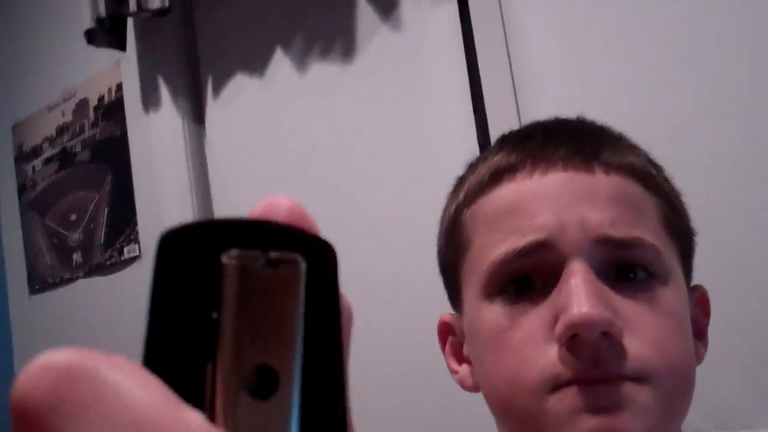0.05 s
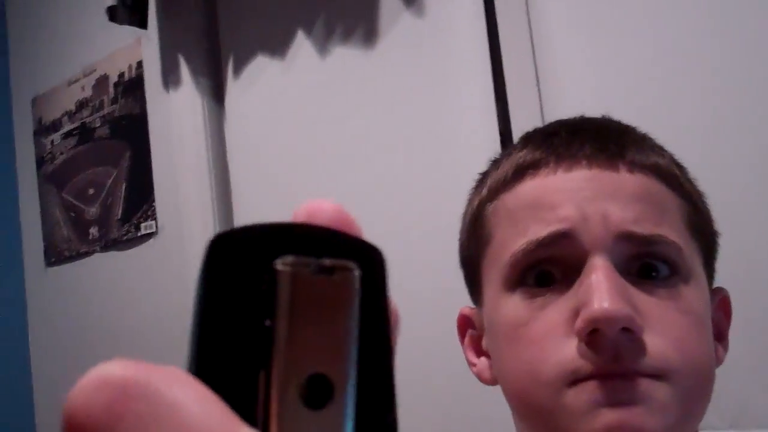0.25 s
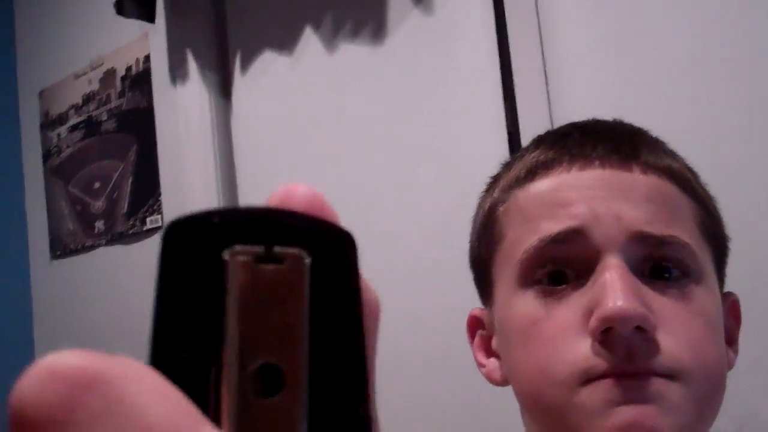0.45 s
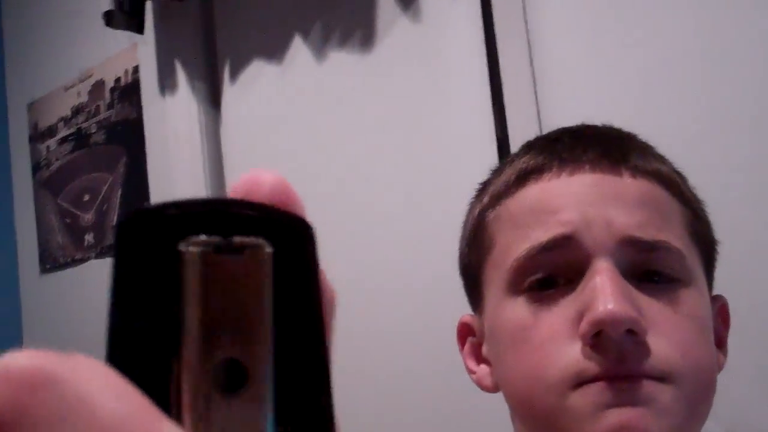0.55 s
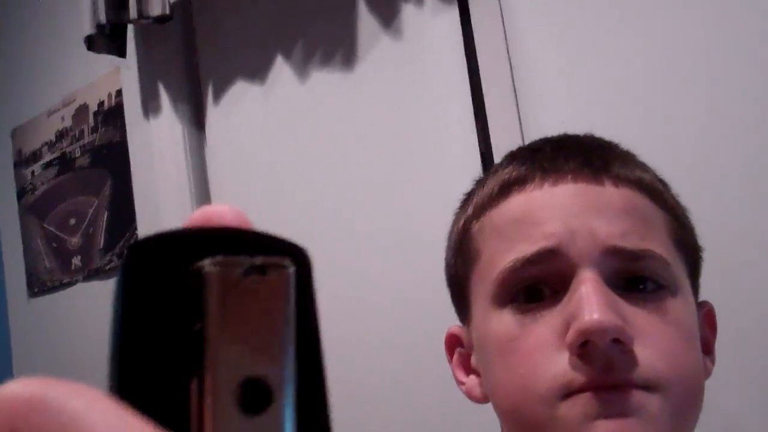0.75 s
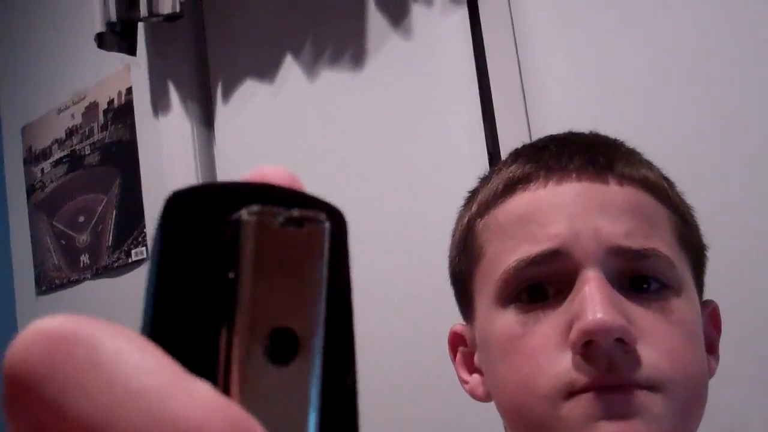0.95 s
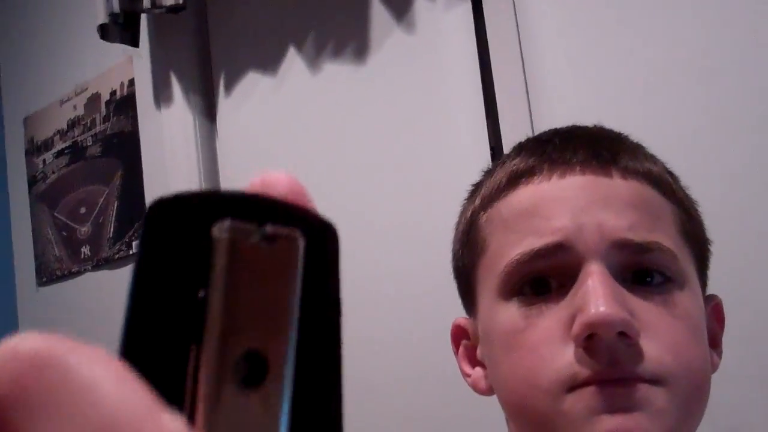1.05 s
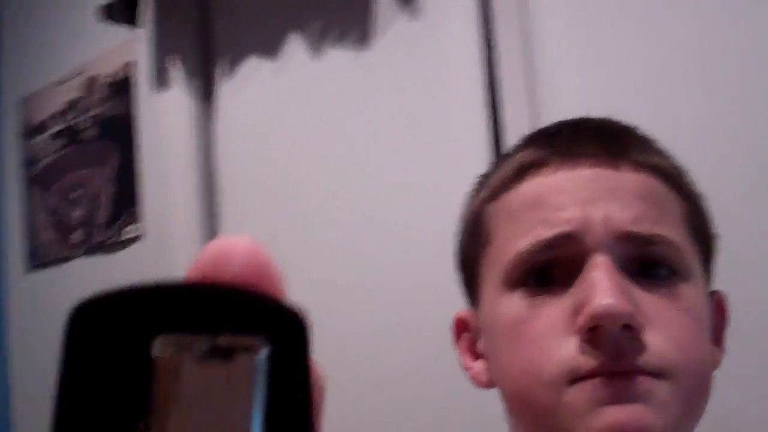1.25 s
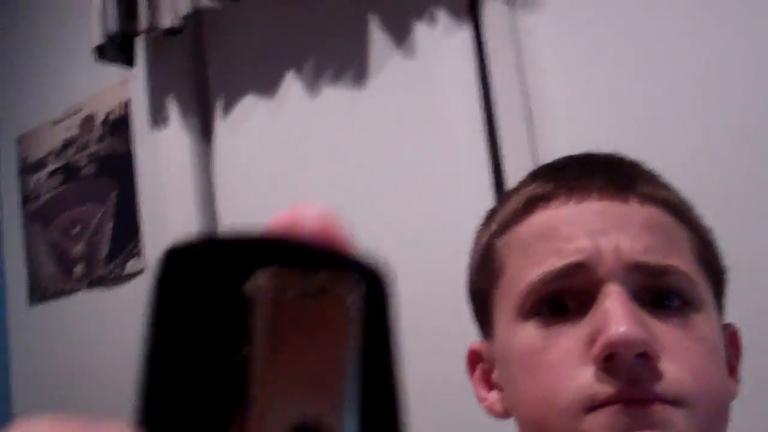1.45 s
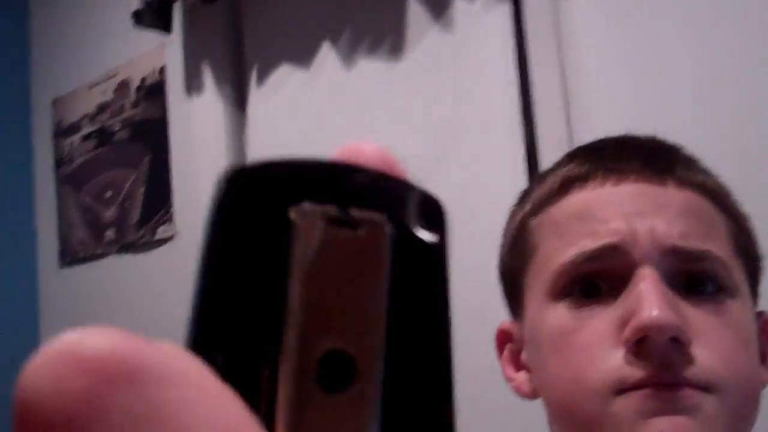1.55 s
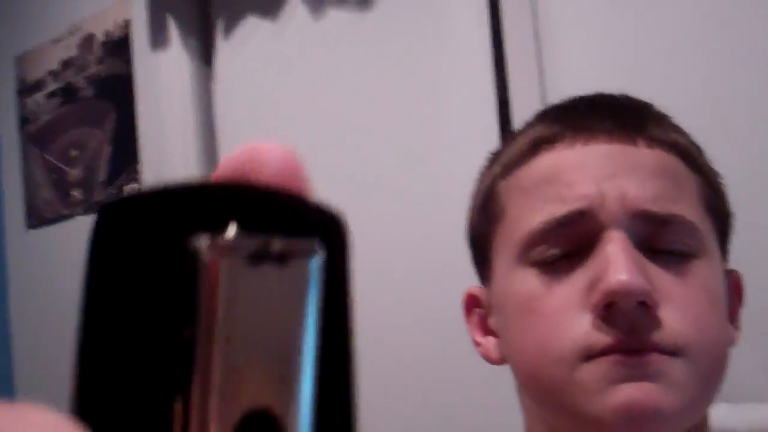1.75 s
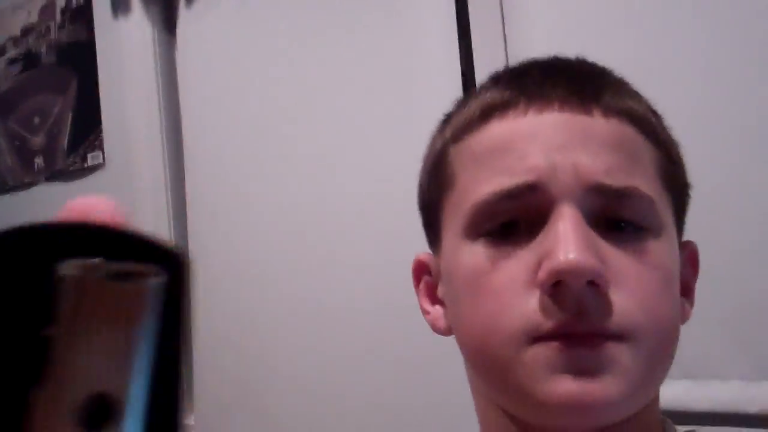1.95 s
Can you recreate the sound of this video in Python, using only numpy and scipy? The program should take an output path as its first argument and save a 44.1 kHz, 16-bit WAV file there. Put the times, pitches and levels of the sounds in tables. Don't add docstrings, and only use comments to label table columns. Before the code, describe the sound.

Stapler squeezed hard two times near the microphone, overloaded cracks followed by crisp spring-back clicks

```python
import sys
import numpy as np
from scipy import signal
from scipy.fft import rfft, irfft
from scipy.io import wavfile
from scipy.ndimage import uniform_filter1d

SR = 44100
rng = np.random.default_rng(int(sys.argv[2]) if len(sys.argv) > 2 else 0)


def gain_from_db(level_db):
    decades = np.asarray(level_db, float) / 20
    return 10 ** decades


def pcm_store(signal):
    levels = np.round(np.clip(np.atleast_2d(signal), -1, 1) * 32767)
    wavfile.write(sys.argv[1], SR, levels.astype(np.int16).T)


N = 88288

# (time [s], level [dB])
GAIN_RIDE = [(0, 0), (.44, 0.5), (.48, -11), (.8, -7), (1.08, 0), (1.17, -1.5), (1.58, 2.5), (1.62, -3),
             (1.9, -12.5), (2.0, -19.5)]
# (frequency [Hz], level [dB per Hz])
RUMBLE_COLOUR = [(25, -8), (80, -8), (200, -7), (370, -5), (620, -6), (1000, -11), (1500, -11.5),
                 (3000, -28.5)]
# (frequency [Hz], level [dB])
HISS_COLOUR = [(800, 0.5), (2000, -1.5), (6000, -1), (13500, -1)]
# (frequency [Hz], level [dB], width [Hz])
HUM_TONES = [
    (124, -63, 2.3),
    (295, -76, 6.0),
    (603, -69.5, 2.7),
]
RUMBLE_DB, RUMBLE_FOLLOWS = -61, 0.97
HISS_DB, HISS_FOLLOWS = -56.5, 0.37

# (frequency [Hz], fall by 60 dB [s])
ROOM_DECAY = [(200, 0.04), (700, .2), (1600, 0.2), (4500, 0.28), (9000, 0.25), (14000, 0.17)]
# (frequency [Hz], level [dB])
ROOM_COLOUR = [(200, -16), (700, -2), (1500, -7), (3000, -5), (6200, -4), (9000, -5.5), (14000, 1.5)]
# (frequency [Hz], left-right likeness [0 to 1])
STEREO_LIKENESS = [(200, 0.65), (550, .8), (1600, 0.21), (5000, 0.06)]
SLAM_ROOM_DB, CLICK_ROOM_DB = -6, -18
WALL_S, BUILD_S = 0.0014, 0.002
NEAR_DB, NEAR_T60_S = 9.5, 0.04
PANEL_HZ, PANEL_WIDTH_HZ, PANEL_DB, PANEL_T60_S = 1520, 300, -15, 0.4

# (time [s], level [dB], chatter length [ms], favoured frequency [Hz], favour [dB])
SLAM_HITS = [
    (.4655, 11, 3.58, 1682, 4.5),
    (1.6003, 9.5, 4.55, 10630, 1),
]
# (time [s], peak [dB], chatter length [ms], favoured frequency [Hz],
# favour [dB])
STAPLER_CLICKS = [(.0219, -1.5, 1.75, 4260, 3.5), (.0271, -5.5, 1.4, 4640, 14.5), (.4625, -12.5, 5, 9000, 7),
                  (.595, -21, 2, 9300, 5), (.6915, -5.5, 0.84, 2050, 21), (.7105, -13.5, 1.16, 7900, 12.5),
                  (.8292, -13, 1.2, 5400, 3.5), (1.0412, -17.5, 1.56, 3420, 17), (1.063, -23, 9.1, 10100, 19),
                  (1.0708, -2.5, 1.6, 3870, 4.5), (1.0757, -6, 0.94, 4170, 8.5), (1.7277, -19.5, 3, 9600, 8),
                  (1.7686, -12.5, 1.1, 2140, 2), (1.771, -6, 1.5, 2050, 14.5), (1.7732, -5, 1.8, 4200, 25),
                  (1.7833, -55.5, 2.5, 9050, 7), (1.7856, -5.5, 0.23, 9200, 15),
                  (.096, -35, 0.68, 910, 34), (0.448, -35.5, 7.6, 8570, 4), (0.686, -32, 3.7, 1500, -21),
               (0.7601, -29, 1.3, 1010, 14.5), (1.0225, -34, 2.2, 1490, 22.5), (1.028, -39, 3.2, 1600, 19),
               (1.057, -34.5, 9.3, 6500, -1), (1.1225, -30, 1.2, 996, 24.5), (1.4, -38.5, 1.8, 5960, 8.5),
               (1.59, -26.5, 14, 7680, 2.5), (1.734, -29, 32.0, 4030, -4), (.669, -39.5, 16, 1540, 28),
               (1.9121, -35, 1.2, 1350, 11), (1.916, -42, 6.6, 1350, 19.5),
               (0.6921, -8.5, 0.87, 4040, 12.5), (0.83, -19, 1.04, 3200, 13.5),
               (1.786, -25.5, 1.3, 500, 18), (.712, -32, 2.0, 403, 18)]
# (frequency [Hz], level [dB], fall by 60 dB [s])
FRAME_MODES = [(355, -1.5, 0.0094), (886, -9.5, 0.036), (1642, -9, 0.027), (2050, 0.5, 0.0055),
               (2663, -9.5, 0.0053), (3255, -13, 0.0072), (3915, 1.5, 0.0065), (4338, 8.5, 0.005),
               (5546, 13.5, 0.0027), (7346, 1, .008), (8350, 15, 0.0031), (9980, 13.5, 0.0045),
               (11417, 12, 0.0027), (12620, -3.5, .006)]
FAVOUR_Q, RADIATES_ABOVE_HZ, LONGEST_RING_S = 3.3, 480, 0.012
STRIKE_SPREAD_DB, SIDE_SPREAD_DB = 2, 4
CRACK_DB, CHATTER_GRIT_DB, LEFT_DB = 9, 4, 0.7
SLAM_SETTLE_MS, CLICK_SETTLE_MS = 4.0, 0.69
LEAD = 110

# (time [s], left level [dB], right level [dB], length [ms])
BIAS_KICKS = [
    (.466, -11, -5.5, 6.43),
    (1.5991, -14.5, -6.5, 6.6),
]
COUPLING_HZ, SLOW_COUPLING_HZ, SLOW_SHARE = 30, 7.3, 0.17
CLIP, CUTOFF_HZ, STEADY_CUTOFF_HZ = 0.86, 15300, 14500


def at_hz(points, hz):
    table_hz, values = np.transpose(points)
    return np.interp(np.log(hz), np.log(table_hz), values)


def rms_one(x):
    return x / np.sqrt(np.mean(x ** 2) + 1e-20)


def peak_filter(x, hz, q):
    return signal.lfilter(*signal.iirpeak(hz, q, fs=SR), x)


def cut(x, hz):
    return signal.sosfilt(signal.cheby2(22, 50, hz, fs=SR, output="sos"), x)


def bands(size, level):
    out = 0
    edges = 30 * 2 ** np.arange(0, 9.3, 0.5)
    white = rng.standard_normal((2, 2, size))
    for k, (low, high) in enumerate(zip(edges, edges[1:])):
        band = signal.butter(2, [low, high], "band", fs=SR, output="sos")
        mid, side = signal.sosfilt(band, white[k % 2])
        hz = np.sqrt(low * high)
        alike = np.clip(at_hz(STEREO_LIKENESS, hz), 0, 1)
        stereo = np.sqrt(1 + alike) * mid + np.sqrt(1 - alike) * side * [[1], [-1]]
        out = out + level(hz) * stereo
    return out


def background():
    t = np.arange(N) / SR
    gain_db = np.interp(t, *np.transpose(GAIN_RIDE))
    rumble = rms_one(bands(N, lambda hz: gain_from_db(at_hz(RUMBLE_COLOUR, hz)) * (hz < 4000)))
    hiss = rms_one(bands(N, lambda hz: gain_from_db(at_hz(HISS_COLOUR, hz)) * (hz > 700)))
    out = gain_from_db(RUMBLE_DB + RUMBLE_FOLLOWS * gain_db) * rumble
    out += gain_from_db(HISS_DB + HISS_FOLLOWS * gain_db) * hiss
    for hz, db, width_hz in HUM_TONES:
        wander = np.cumsum(rng.standard_normal(N)) * np.sqrt(2 * np.pi * width_hz / SR)
        out += gain_from_db(db + gain_db) * np.sin(2 * np.pi * hz * t + wander)
    return out * gain_from_db([[LEFT_DB], [-LEFT_DB]])


def walls(x):
    t = np.arange(SR // 2) / SR
    tail = rms_one(bands(len(t), lambda hz: gain_from_db(at_hz(ROOM_COLOUR, hz) - 60 * t / at_hz(ROOM_DECAY, hz))))
    panel = peak_filter(rng.standard_normal((2, len(t))), PANEL_HZ, PANEL_HZ / PANEL_WIDTH_HZ)
    tail = tail + gain_from_db(PANEL_DB) * rms_one(panel * gain_from_db(-60 * t / PANEL_T60_S))
    near = 1 + gain_from_db(NEAR_DB - 60 * t / NEAR_T60_S)
    build = 1 - np.exp(-np.maximum(t - WALL_S, 0) / BUILD_S)
    tail = tail * near * build
    return signal.fftconvolve(x[None], tail / np.sqrt(len(t)), axes=1)[:, :N]


def steel_chatter(length_ms, settle_ms, favoured_hz, favour_db):
    ms = np.arange(SR // 25) * 1000 / SR
    grit = rng.standard_normal(len(ms)) * gain_from_db(CHATTER_GRIT_DB * rng.standard_normal(len(ms)))
    chatter = grit * np.exp(-np.maximum(ms - length_ms, 0) / settle_ms - ms / (2 * length_ms))
    tones = rfft(np.roll(chatter, LEAD))
    chatter = irfft(tones / np.sqrt(uniform_filter1d(abs(tones) ** 2, size=16)))
    return chatter + (gain_from_db(favour_db) - 1) * peak_filter(chatter, favoured_hz, FAVOUR_Q)


def contacts(rows, settle_ms):
    out = np.zeros((3, N + SR))
    hz, db, t60 = np.transpose(FRAME_MODES)[:, :, None]
    t = np.arange(SR // 30) / SR
    modes = np.sin(2 * np.pi * hz * t) * gain_from_db(db - 60 * t / np.minimum(t60, LONGEST_RING_S))
    for s, peak_db, length_ms, favoured_hz, favour_db in rows:
        strike, side = rng.standard_normal((2, len(hz)))
        sides_db = (SIDE_SPREAD_DB * side + LEFT_DB) * np.array([[1], [-1], [0]])
        body = gain_from_db(STRIKE_SPREAD_DB * strike + sides_db) @ modes
        body[2] = 0
        body[:, 0] += gain_from_db(CRACK_DB)
        chatter = steel_chatter(length_ms, settle_ms, favoured_hz, favour_db)
        hit = signal.fftconvolve(body, chatter[None], axes=1)
        hit[2] *= np.std(hit[:2]) / np.std(hit[2])
        i = int(s * SR) - LEAD
        out[:, i:i + hit.shape[1]] += hit * gain_from_db(peak_db) / np.abs(hit[:2].mean(0)).max()
    radiates = signal.butter(2, RADIATES_ABOVE_HZ, "high", fs=SR, output="sos")
    return signal.sosfilt(radiates, out[:, :N])


def scene():
    slams = contacts(SLAM_HITS, SLAM_SETTLE_MS)
    clicks = contacts(STAPLER_CLICKS, CLICK_SETTLE_MS)
    echoes = walls(gain_from_db(SLAM_ROOM_DB) * slams[2] + gain_from_db(CLICK_ROOM_DB) * clicks[2])
    return slams[:2] + clicks[:2] + cut(echoes + background(), STEADY_CUTOFF_HZ)


def bias_kicks():
    out = np.zeros((2, N))
    t = np.arange(N) / SR
    for s, left_db, right_db, length_ms in BIAS_KICKS:
        push = np.sin(np.pi * np.clip((t - s) * 1000 / length_ms, 0, 1)) ** 2
        out += gain_from_db([[left_db], [right_db]]) * push
    fast = signal.lfilter(*signal.butter(1, COUPLING_HZ, "high", fs=SR), out)
    slow = signal.lfilter(*signal.butter(1, SLOW_COUPLING_HZ, "high", fs=SR), out)
    return fast + SLOW_SHARE * (slow - fast)


def low_pass(x):
    return signal.sosfilt(signal.butter(12, 15540, fs=SR, output="sos"), x)


def record(dry):
    clipped = np.clip(dry + bias_kicks(), -CLIP, CLIP)
    mix = cut(clipped, CUTOFF_HZ)
    return low_pass(mix)


dry = scene()
out = record(dry)
pcm_store(out)
```